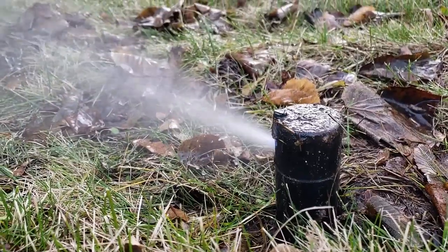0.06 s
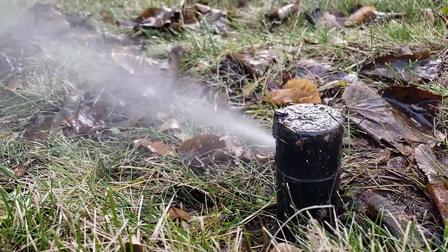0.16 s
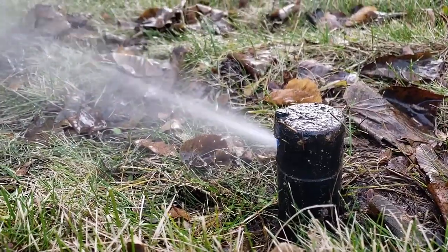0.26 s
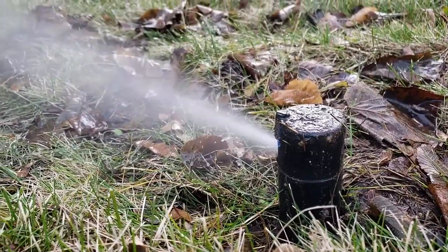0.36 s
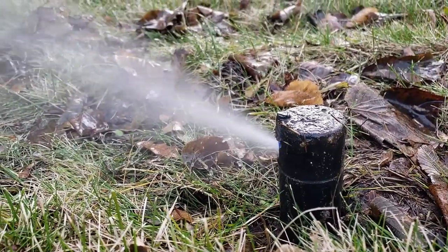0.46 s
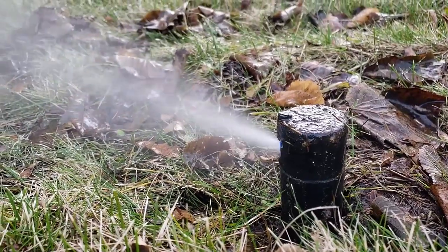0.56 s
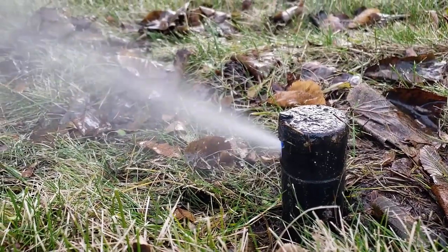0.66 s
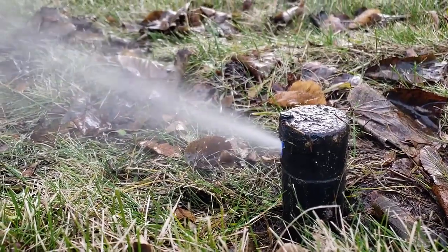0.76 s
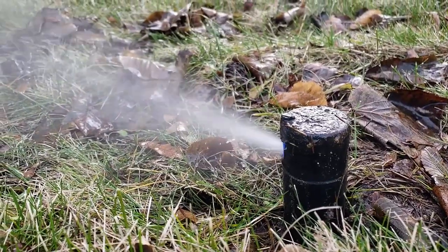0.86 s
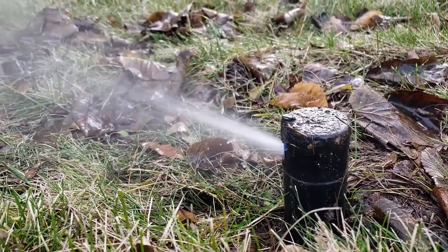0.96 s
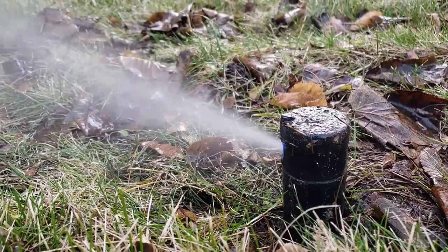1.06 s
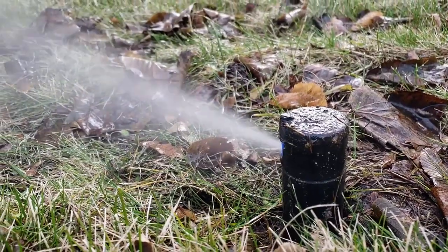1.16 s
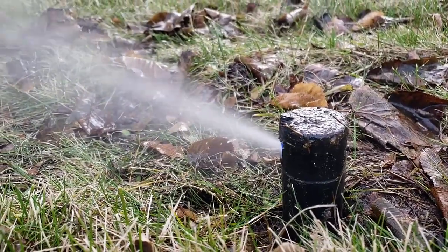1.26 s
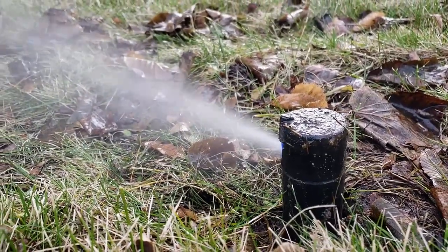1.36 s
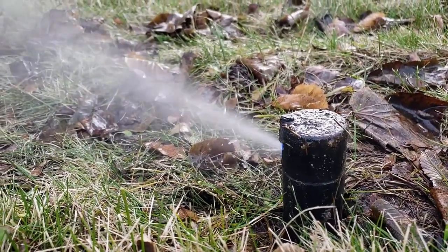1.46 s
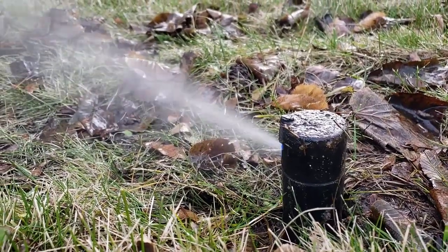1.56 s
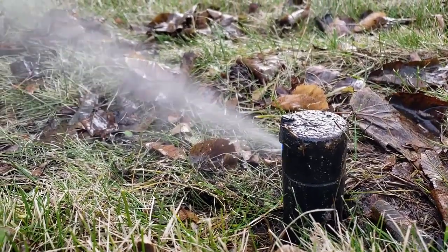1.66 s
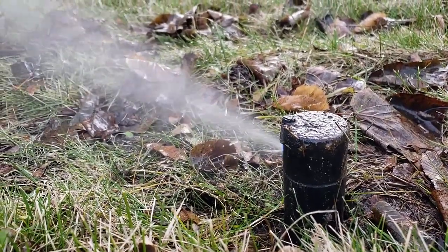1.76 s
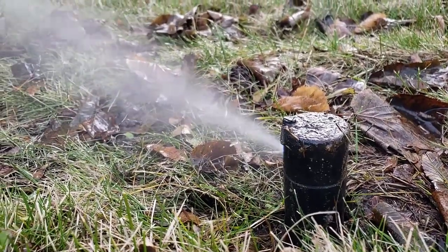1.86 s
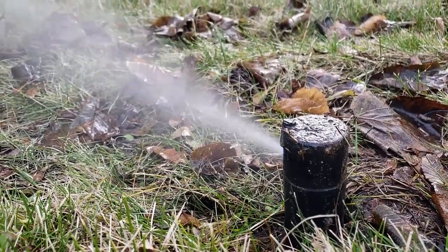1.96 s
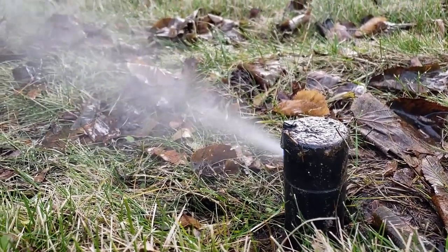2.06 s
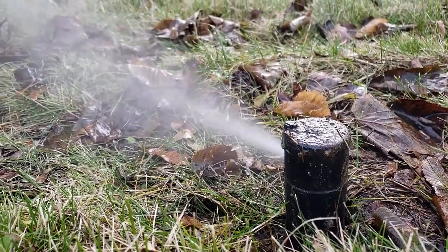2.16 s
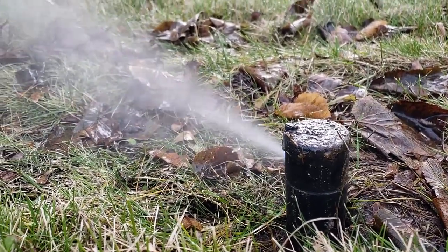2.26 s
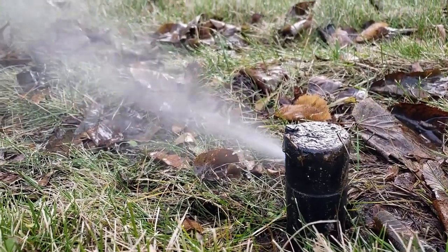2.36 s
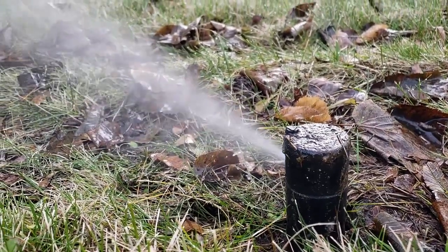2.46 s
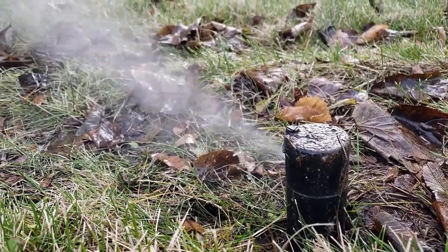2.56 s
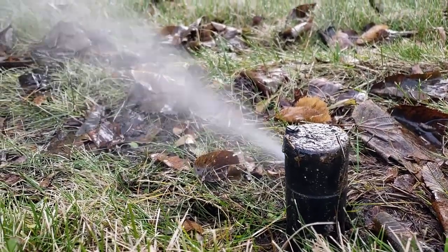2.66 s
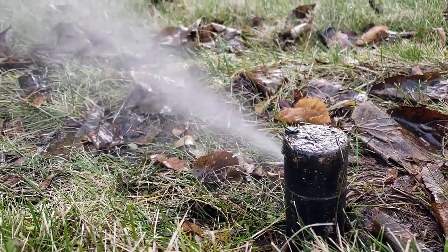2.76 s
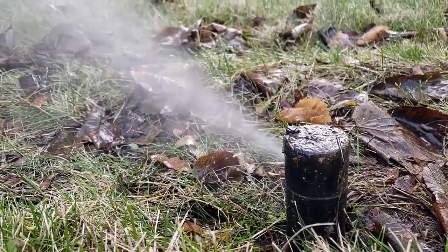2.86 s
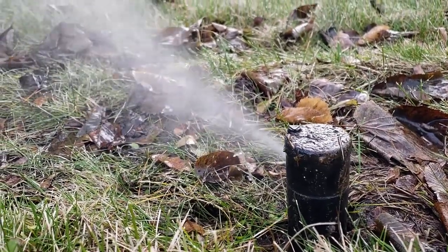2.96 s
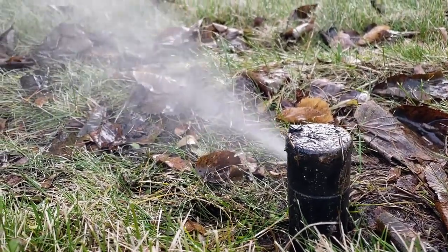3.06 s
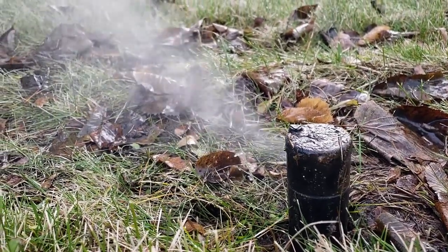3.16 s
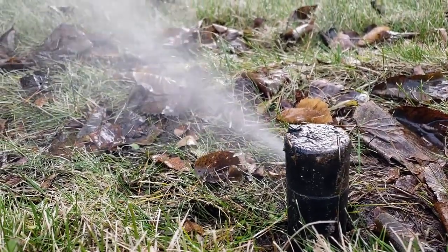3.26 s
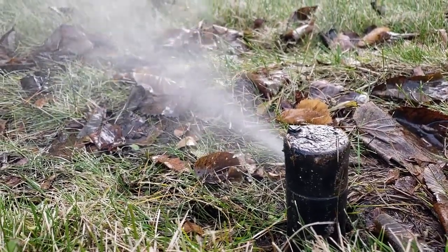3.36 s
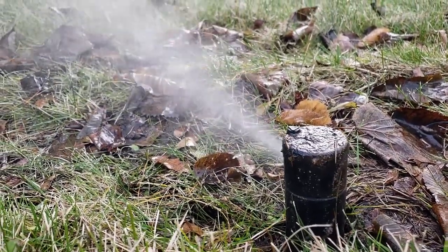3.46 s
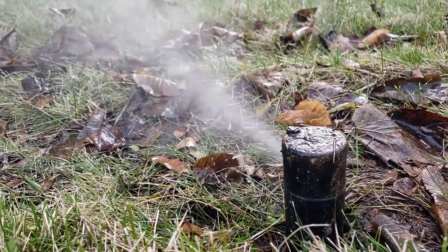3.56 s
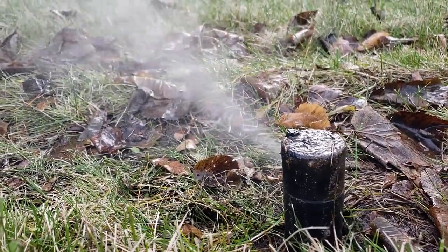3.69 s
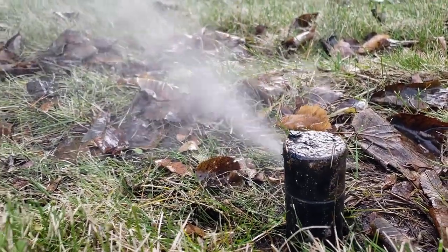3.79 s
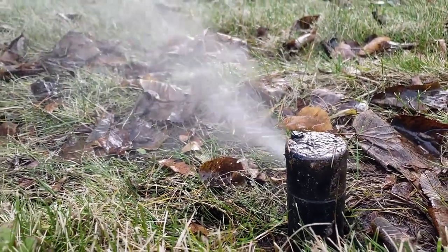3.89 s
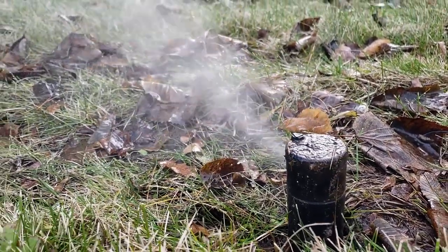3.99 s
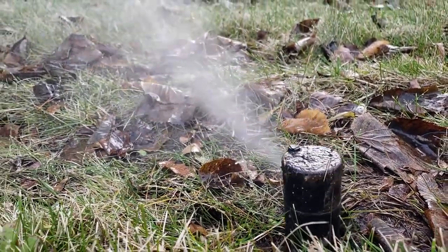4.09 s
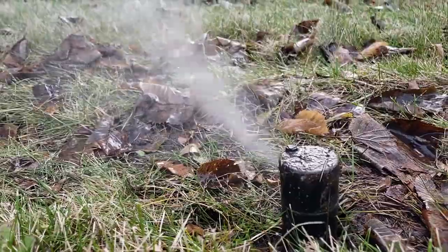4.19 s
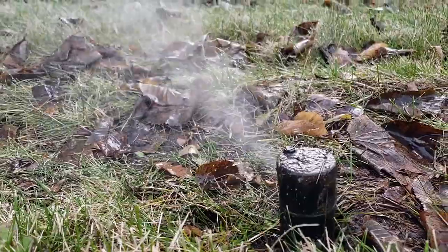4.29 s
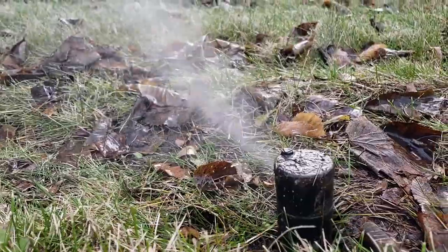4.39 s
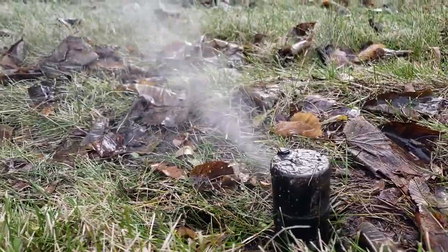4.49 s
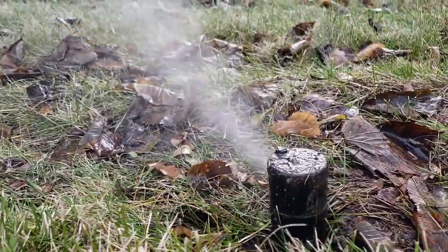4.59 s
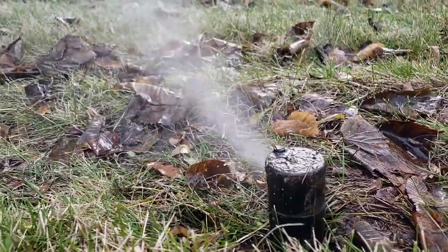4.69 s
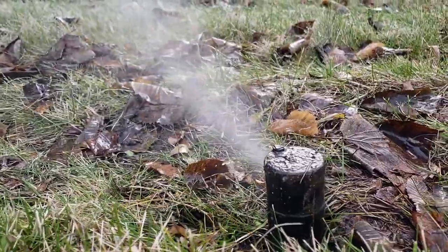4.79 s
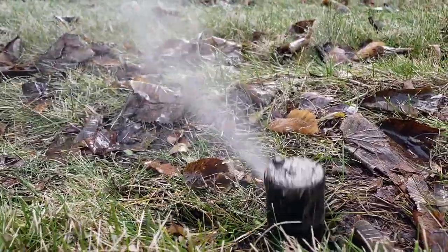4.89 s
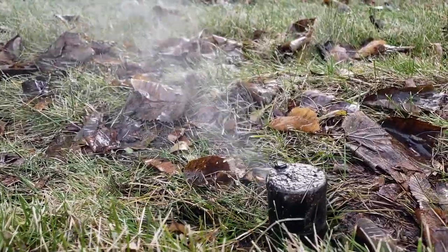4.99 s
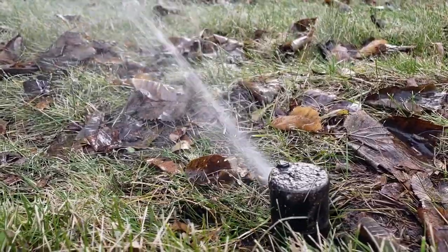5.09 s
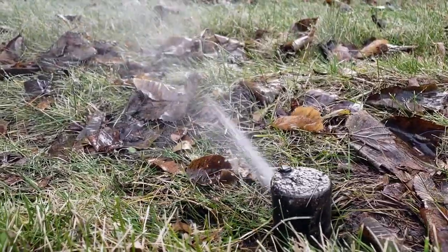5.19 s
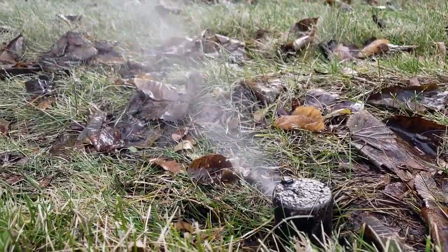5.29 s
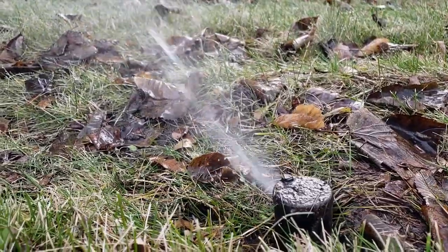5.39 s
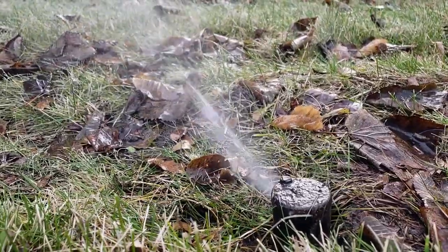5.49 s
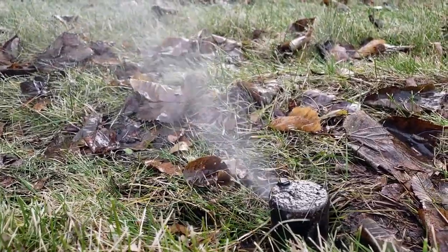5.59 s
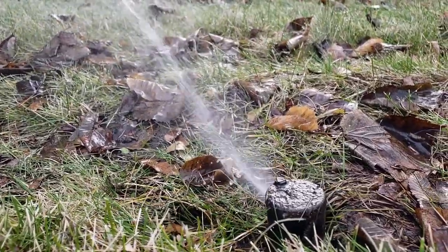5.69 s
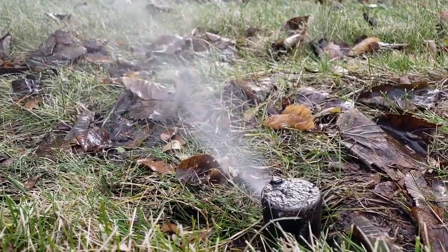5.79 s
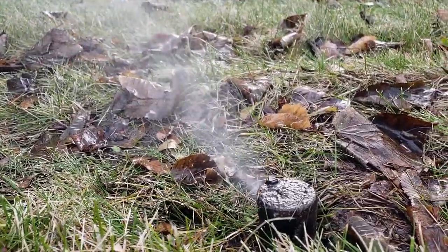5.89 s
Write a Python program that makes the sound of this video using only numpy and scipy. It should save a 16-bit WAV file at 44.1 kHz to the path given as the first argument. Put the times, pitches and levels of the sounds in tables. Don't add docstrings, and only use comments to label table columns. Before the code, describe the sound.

A loud, close sprinkler hiss of air and fine mist runs steadily, then starts stuttering and sputtering in quick tiny dropouts.

```python
import sys
import numpy as np
from scipy import signal
from scipy.fft import rfft, irfft, next_fast_len
from scipy.io import wavfile
from scipy.ndimage import uniform_filter1d, map_coordinates

SR = 44100
rng = np.random.default_rng(int(sys.argv[2]) if len(sys.argv) > 2 else 0)


def boost(x):
    u = np.asarray(x, float) / 20
    return 10 ** u


def transcribe(u):
    v = np.clip(np.atleast_2d(u).T, -1, 1)
    q = np.round(v * 32767).astype(np.int16)
    wavfile.write(sys.argv[1], SR, q)


N = 261954
FRAME = 1024


def unit(x):
    return x / np.sqrt(np.mean(np.abs(x) ** 2) + 1e-20)


def mid_rms(pair):
    return np.sqrt(np.mean(pair.mean(axis=0) ** 2))


def curve(rows, t=None):
    return np.interp(np.arange(N) / SR if t is None else t, *np.transpose(rows))


def wobble(rate, count=N):
    knots = rng.standard_normal(int(N * rate / SR) + 4)
    return map_coordinates(knots, [np.arange(count) * (N / count * rate / SR)])


def coloured(x, response):
    m = next_fast_len(N + 8192)
    spectrum = rfft(x, m) * response(np.fft.rfftfreq(m, 1 / SR))
    return irfft(spectrum, m)[..., :N]


def sample_at(t):
    return np.minimum((t * SR).astype(int), N - 1)


def turbulence(spit_db, flutter_db, drops_per_s, drop_db):
    flutter = boost(flutter_db * wobble(260) + spit_db * wobble(60))
    noise = unit(rng.standard_normal((3, N)) * flutter)
    when, size = rng.random((int(drops_per_s * N / SR), 2)).T
    spits = np.bincount((when * N).astype(int), 1 / np.maximum(size, .03), N)
    spits = np.sqrt(np.abs(uniform_filter1d(spits, size=40)))
    first_only = np.eye(3)[:, :1]
    return noise + first_only * boost(drop_db) * unit(spits * rng.standard_normal(N))


def responses(hz, rows):
    left = right = scattered = 0
    for centre, width, db, pan_db, lead, phase in rows:
        shape = boost(db) / (1 + (2 * (hz - centre) / width) ** 2) ** 2
        port = boost(pan_db / 2) * np.exp(.5j * lead)
        left = left + shape * (np.exp(1j * phase) * port)
        right = right + shape * (np.exp(1j * phase) / port)
        scattered = scattered + shape ** 2
    return np.array([left, right, np.sqrt(scattered)])


def fringes(hz, t, sway):
    # (centre [Hz], width [Hz], level [dB], left minus right [dB], left lead [rad], phase [rad])
    aim_left = [(960, 810, -33.2, -2.1, 0.11, -1.08), (1410, 1300, -31.4, -2.6, -0.22, 3.53),
                (1880, 2580, -37.3, -12.0, 0.32, 1.49), (2390, 670, -14.9, 3.3, -0.33, 2.95),
                (2830, 970, -8.2, 1.0, 0.14, 4.62), (4040, 2360, -6.0, 2.1, 0.12, 6.3),
                (4880, 1590, -3.9, 3.4, 0.33, 9.22), (5850, 1320, 2.5, 1.1, -0.35, 9.04),
                (5980, 2230, -1.7, -1.2, -0.7, 12.2), (7290, 970, -9.0, -2.4, 2.97, 12.06),
                (8020, 760, -13.0, 4.2, 0.9, 12.51), (8850, 2600, -4.6, -0.8, 1.61, 15.08),
                (9390, 2600, -4.7, -4.3, 1.23, 18.0), (11020, 2600, -0.9, -3.0, 3.15, 17.39),
                (11710, 890, 0.6, -0.6, 5.53, 17.52), (11820, 2050, -1.3, -0.6, 4.22, 20.52),
                (13550, 1950, -1.6, -2.7, 7.53, 19.99), (13910, 1200, 2.3, -1.9, 6.65, 22.93),
                (14880, 1220, -2.2, 0.5, 9.92, 21.47), (15160, 2350, -1.1, -1.8, 10.18, 23.93)]
    aim_away = [(920, 810, -28.3, 0.2, 0.13, -0.9), (1520, 1610, -24.9, -2.3, -0.34, 4.03),
                (1970, 1860, -21.8, -3.2, -0.71, 0.85), (2280, 520, -10.4, 3.5, -0.68, 3.59),
                (2890, 970, -2.3, 0.9, 0.33, 4.74), (4010, 1310, -1.1, 0.9, -0.02, 6.09),
                (5180, 1280, -2.8, 3.7, 1.46, 7.36), (6010, 1470, 3.0, -0.5, -0.14, 9.79),
                (6300, 1540, 0.2, -0.6, -0.88, 12.97), (7420, 1080, -3.8, -1.9, 2.75, 13.09),
                (8350, 490, -16.0, 4.4, -2.25, 12.86), (9230, 1700, -3.8, 0.6, 1.9, 15.45),
                (9930, 1440, -1.1, -0.2, 1.53, 17.9), (11430, 2580, -1.3, -3.1, 3.8, 18.66),
                (12380, 1820, -1.3, -6.6, 7.74, 17.79), (12510, 1220, -0.5, -2.4, 7.1, 20.91),
                (13660, 2500, 1.6, -0.2, 8.09, 21.01), (14220, 2470, -0.8, -0.6, 7.69, 23.96),
                (15190, 940, 0.6, -2.7, 9.64, 20.84), (14990, 2440, -2.0, -4.1, 10.22, 23.81)]
    tilt_one = [(990, 540, -32.2, 4.0, -0.89, 1.37), (1390, 450, -23.9, 4.3, 0.59, 4.58),
                (1650, 2600, -25.4, 5.8, 0.69, 2.29), (2290, 350, -15.2, 1.7, -0.52, 3.64),
                (2900, 890, -5.5, 0.2, -0.02, 4.26), (3830, 2600, -5.5, 5.2, 0.26, 5.75),
                (4270, 1770, 1.4, 2.1, 0.58, 8.21), (5650, 1680, -5.3, -4.2, 1.76, 8.26),
                (6240, 2240, -0.9, -8.8, 0.65, 11.07), (6590, 1430, -1.6, -8.1, -0.01, 14.04),
                (7740, 1520, -10.7, -2.3, 2.68, 14.31), (8770, 2600, -13.0, -1.3, 0.45, 14.83),
                (9650, 810, -10.6, -3.9, 2.8, 14.92), (10580, 2600, -2.7, 1.6, 0.55, 17.96),
                (10920, 2410, -1.1, 0.9, 5.21, 18.24), (11920, 310, -14.8, -5.9, 5.59, 15.27),
                (12730, 1860, -4.5, -1.0, 8.7, 18.15), (13980, 1740, -1.8, -11.2, 15.04, 20.54),
                (14050, 2600, -0.5, -9.1, 8.81, 20.71), (15530, 710, -11.8, -10.3, 13.09, 20.35)]
    tilt_two = [(1110, 440, -15.3, 2.1, 0.79, 5.11), (1390, 390, -10.7, 6.6, 0.49, 7.35),
                (1870, 1240, -19.2, 12.0, 0.53, 9.86), (2230, 1050, -15.7, 5.1, 0.36, 13.0),
                (3020, 1520, -10.2, 0.1, 0.32, 15.9), (4120, 1410, -6.3, 12.0, 0.61, 16.69),
                (4510, 1770, 2.2, 4.3, 1.8, 18.58), (5150, 2450, 0.9, 1.9, 1.66, 20.99),
                (6130, 1550, -4.4, -2.6, 1.92, 18.39), (6850, 2220, -9.8, -3.1, 1.76, 22.12),
                (7710, 1520, -20.3, 11.9, 3.78, 22.75), (9220, 1910, -7.8, -0.2, 3.16, 25.53),
                (10120, 2600, -1.4, -1.0, 3.22, 28.33), (10760, 1950, -1.8, 2.2, 3.78, 29.96),
                (11550, 2600, -2.1, -4.3, 4.06, 32.12), (12350, 2600, -2.5, -2.8, 3.93, 35.07),
                (13200, 2040, -1.9, -3.1, 3.19, 38.06), (14240, 2600, -1.3, -1.6, 2.97, 40.86),
                (14560, 1670, -3.0, -2.6, 2.21, 44.08), (15390, 2220, -5.7, -3.9, 4.53, 43.8)]
    tilt_three = [(1060, 360, -14.3, 1.8, 0.38, 5.56), (1430, 560, -10.7, 6.2, 0.78, 5.72),
                  (1900, 1150, -12.5, 11.9, 0.24, 8.4), (2210, 950, -11.8, 8.7, -0.52, 11.39),
                  (3150, 2560, -11.2, 12.0, 3.58, 10.67), (3450, 2220, -5.2, 8.9, 2.01, 14.11),
                  (3920, 1930, -7.0, 5.5, 0.92, 17.28), (5390, 2600, 0.1, 1.1, 1.9, 20.37),
                  (6340, 1120, -5.5, -4.4, 3.16, 20.69), (6440, 2600, -2.9, -3.6, 2.38, 23.71),
                  (7490, 1620, -10.8, -5.9, 3.11, 26.74), (8460, 2590, -12.5, -0.6, 2.7, 28.27),
                  (9720, 1180, -3.8, -1.1, 2.33, 29.73), (9880, 1180, -4.2, -4.5, -2.21, 29.38),
                  (10860, 2600, -1.6, -5.8, -0.49, 32.42), (11700, 2600, -1.9, -5.4, -1.17, 35.37),
                  (12530, 2560, -4.4, -5.0, -1.44, 38.2), (13700, 2600, 0.3, -3.1, -1.67, 40.98),
                  (14190, 2290, 2.2, -3.1, -1.98, 44.12), (15280, 1970, -10.8, -1.3, 1.68, 44.21)]
    # (centre [Hz], width [Hz], level [dB], left minus right [dB], left lead [rad], phase [rad])
    riser = [
        (392, 306, -23, 15.5, .05, 1.2),
        (558, 308, -15.5, -2.2, 0.16, 1.12),
    ]
    # (time [s], level [dB])
    riser_heard = [(0, -1), (.3, -3.5), (1.1, -5), (1.4, -3.5), (1.68, -7), (1.95, -2), (2.4, 0), (2.7, -2),
                   (3.4, 2.5), (3.95, 4), (4.25, -2), (4.45, 0), (4.65, -3.5), (5.0, 0.5), (5.25, 2.5),
                   (5.45, -0.5), (5.9, 1.5)]
    # (time [s], share of the swing [0-1])
    turn = [(.7, 0.0043), (1.5, 0.082), (2.1, 0.27), (2.8, 0.73), (3.5, 1.08), (4.1, 1.01)]
    # (start [s], end [s])
    tilts = [
        (4.1, 4.2),
        (4.96, 5.03),
        (5.3, 5.45),
    ]

    hz = hz[:, None] * (1 + sway * wobble(3.4)[sample_at(t)])
    left, away = np.array(aim_left)[..., None], np.array(aim_away)[..., None]
    sets = [left + (away - left) * curve(turn, t), tilt_one, tilt_two, tilt_three]
    tipped = sum(np.interp(t, span, [0, 1]) for span in tilts)
    ground = 0
    for k, rows in enumerate(sets):
        ground = ground + np.clip(1 - np.abs(tipped - k), 0, 1) * responses(hz, rows)
    gurgle_db = 1.0 * wobble(30, count=len(t))
    return ground + boost(curve(riser_heard, t) + gurgle_db) * responses(hz, riser)


def nulls(hz, t, rows, flicker):
    fade_s, wander = .04, .012
    loss_db = np.zeros((len(hz), len(t)))
    for start, end, first_hz, last_hz, db in rows:
        drift = np.interp(t, [start, end], [first_hz, last_hz])
        centre = drift * (1 + wander * wobble(4.93, count=len(t)) * np.sqrt(2000 / first_hz))
        steadiness = 1 if db > 0 else .5
        unsteady = np.exp(flicker * np.tanh(wobble(12, count=len(t))) * steadiness)
        present = np.clip(np.minimum(t - start, end - t) / fade_s, 0, 1) * unsteady
        on = present > 0
        width = 90 + .021 * centre[on]
        loss_db[:, on] += db * present[on] * np.exp(-((hz[:, None] - centre[on]) / width) ** 2)
    return boost(-loss_db)


def at_ports(hz, t, z, choke_db):
    # (start [s], end [s], first centre [Hz], last
    # centre [Hz], depth [dB])
    shared_nulls = [(-.3, 1.7, 1600, 1600, 5), (1.7, 4.2, 1600, 1550, 5), (-.3, 4.3, 1810, 1780, -6),
                    (-.3, 4.95, 2030, 1950, 7), (-.3, 2.2, 4500, 4550, 4.5), (2.2, 4.1, 4600, 4800, 2.5),
                    (-.3, 4.1, 6300, 6450, 4), (1.65, 2.5, 7800, 8000, 16), (2.45, 3.85, 8050, 8150, 5),
                    (5.05, 5.36, 8700, 8600, -8), (1.7, 2.6, 10500, 10900, 6), (4.08, 4.4, 11500, 11900, 7),
                    (4.3, 5.05, 9700, 9800, 5), (4.55, 4.96, 7450, 7700, 11), (4.6, 4.96, 12000, 12200, 6),
                    (5.1, 5.42, 2400, 2380, 11), (4.98, 5.35, 6700, 6200, 7), (5.33, 5.45, 4400, 4250, 13),
                    (5.35, 5.45, 3900, 3600, 8), (5.47, 5.62, 4500, 4400, 13), (5.55, 5.67, 3800, 3800, 10),
                    (5.75, 5.9, 4450, 4400, 15), (5.75, 5.92, 3700, 3600, 15), (5.36, 5.55, 8700, 8600, -8),
                    (5.7, 5.78, 8300, 8300, -15), (5.55, 5.6, 8600, 8600, -9), (5.6, 5.72, 8400, 8300, 7),
                    (5.75, 6.2, 8500, 8600, 9), (5.3, 5.38, 8000, 8100, -9), (5.42, 5.56, 8200, 8300, -11),
                    (3.8, 4.25, 7800, 7900, -5), (4.0, 4.6, 11400, 11600, 4), (2.3, 3.8, 12000, 12300, 5),
                    (1.3, 2.6, 12700, 12900, 3), (4.96, 5.1, 8400, 8600, 7), (2.6, 4.3, 7250, 7350, -5),
                    (3.8, 4.2, 15500, 15600, -4), (5.23, 5.33, 9300, 9200, 6), (5.13, 5.22, 10000, 10000, 6),
                    (5.5, 5.75, 12200, 11700, 6)]
    # (start [s], end [s], first centre [Hz],
    # last centre [Hz], depth [dB])
    gliding_bands = [(1.1, 3.3, 12100, 12300, -3), (1.1, 4, 13700, 12200, -2), (2.4, 3.3, 13700, 15300, -4),
                     (3.75, 5.4, 14300, 12800, -4), (4.02, 4.6, 15000, 11700, -6.5),
                     (4.8, 3.6, 12200, 13000, -3), (1.3, 4.8, 6340, 6480, -5.5),
                     (0.41, 2.94, 5120, 5220, 3.5), (1.8, 5.2, 7800, 7200, -0.5), (2.9, 3.2, 7700, 7400, 5),
                     (5.4, 6.2, 3700, 4140, -7), (4.8, 6.7, 11000, 12400, -4), (5.6, 6.2, 13000, 13000, -8),
                     (5.5, 4.8, 13300, 11000, 9), (4.9, 4.7, 15500, 15000, 4), (0.75, 1.16, 8500, 8500, 2),
                     (4.55, 4.6, 4350, 4600, 5.5), (3.6, 5.9, 4600, 3900, -1), (1.5, 1.76, 2700, 2600, 8),
                     (4.98, 6.2, 2200, 2470, -1.5), (4.15, 4.4, 1100, 1100, 2), (5.65, 5.4, 1300, 1200, 10),
                     (1.6, 2.3, 12000, 14000, -1), (5.5, 7, 5500, 5300, 3), (4.98, 6.8, 790, 790, -7),
                     (3.8, 4.8, 1770, 2070, -4.5), (1.6, 4.2, 15400, 16000, -3.5),
                     (5.04, 5.8, 14800, 12800, 5), (5.04, 5.7, 11800, 12000, 13), (5.5, 4.5, 6500, 6300, 3),
                     (4.75, 5.4, 1750, 1700, 4), (.2, .8, 1650, 1600, -3), (1.16, 2.2, 1500, 1400, -2.5),
                     (1.95, 2.25, 1860, 2000, 10), (2.2, 2.95, 1750, 1750, 5), (2.5, 2.85, 4400, 4400, 3),
                     (5.0, 5.6, 1050, 1080, -5), (5.2, 4.6, 940, 850, 4.5), (3.04, 3.4, 11400, 11800, 2.5),
                     (1.5, 2.9, 7300, 6900, -3)]

    *direct, scattered = fringes(hz, t, sway=0.0018)
    norm = np.sqrt(np.mean(np.abs(direct[0] + direct[1]) ** 2, axis=0))
    field = uniform_filter1d(rng.standard_normal(z.shape[1:]), size=14, axis=0)
    field = uniform_filter1d(field, size=4, axis=1)
    patch = boost(unit(field) * (0.75 + 0.5 * (hz[:, None] < 900))) / norm
    blades = uniform_filter1d(rng.standard_normal(z[1:].shape), size=3, axis=1)
    blades = uniform_filter1d(blades, size=40, axis=2)
    direct = direct * boost(2.45 * unit(blades))

    riding_db = .6 * uniform_filter1d(choke_db, size=FRAME // 2)[sample_at(t)]
    scatter_db = -17 + riding_db - 6 * (hz[:, None] < 2100)
    ports = direct * z[0] + boost(scatter_db) * scattered * z[1:]
    glides = nulls(hz, t, gliding_bands, flicker=.15)
    cancelled = (1 - nulls(hz, t, shared_nulls, flicker=.5)) * ports.mean(axis=0)
    return patch * glides * (ports - cancelled)


def jet():
    # (time [s], hiss level [dB])
    flow = [(0, -26.5), (.7, -25), (1.3, -25), (1.68, -27.5), (2.2, -26.5), (2.75, -28), (3.1, -27.5),
            (3.5, -28), (4.1, -27), (4.35, -29), (4.8, -28), (5.05, -30.5), (5.25, -28.5), (5.45, -28),
            (5.58, -30), (5.78, -28.5), (5.94, -28)]

    noise = turbulence(spit_db=0.13, flutter_db=0.85, drops_per_s=150, drop_db=-14.5)
    hz, t, z = signal.stft(noise, SR, nperseg=FRAME)
    choke_db = slugs()
    hiss = signal.istft(at_ports(hz, t, z, choke_db), SR, nperseg=FRAME)[1][:, :N]
    hiss = coloured(hiss, lambda hz: 1 / (1 + (250 / (hz + 1)) ** 8))
    mist = coloured(hiss, lambda hz: 1 / (1 + (6500 / (hz + 1)) ** 4))
    surge_db = 0.24 * wobble(6.1) + 0.3 * wobble(16) + 0.31 * wobble(40)
    gain_db = surge_db - choke_db
    choked = (hiss - mist) * boost(gain_db) + mist * boost(0.6 * gain_db)
    return choked / mid_rms(hiss) * boost(curve(flow) + 0.13)


def hum(rows):
    s, hz, db = np.transpose(rows)
    pitch = curve(np.c_[s, hz]) * (1 + 0.0055 * wobble(6.1))
    level_db = curve(np.c_[s, db]) + 3.0 + 1.7 * wobble(4.9)
    return boost(level_db) * np.sin(2 * np.pi * np.cumsum(pitch) / SR)


def yard():
    # (time [s], level [dB])
    rumble_level = [(0, -78), (1.35, -78.5), (1.65, -82), (2.2, -77), (2.7, -78), (3.2, -77), (4, -75.5),
                    (5.94, -73)]
    # (frequency [Hz], density [dB per Hz])
    rumble_spectrum = [(12, -39), (20, -18), (59, -6.5), (197, -9), (230, -11), (300, -34), (510, -120)]
    # (time [s], pitch [Hz], level [dB])
    hum_low = [(0, 64, -86), (3.9, 64, -83), (4.2, 65.3, -77.5), (5.94, 63.6, -70)]
    hum_high = [(0, 175, -107), (4.6, 177.6, -80), (4.8, 173.2, -75.5), (5.94, 170.2, -74)]

    f, db = np.transpose(rumble_spectrum)
    tint = lambda hz: boost(np.interp(np.log(hz + 1), np.log(f + 1), db))
    mid, side = coloured(rng.standard_normal((2, N)), tint)
    rumble = boost(curve(rumble_level) + 4.5) * unit(mid + boost(-22) * np.array([side, -side]))
    machinery = hum(hum_low) * boost([[-2.5], [2.5]]) + hum(hum_high)
    return rumble * boost([[-1.4], [1.4]]) + machinery


def slugs():
    # (time [s], depth [dB], length [s])
    chokes = [(0.521, 8, 0.0085), (1.716, 5.5, 0.016), (2.554, 5, 0.017), (2.67, 3.5, 0.042),
              (2.74, 5, 0.02), (3.243, 4.5, 0.026), (3.273, 9.5, 0.018), (3.312, 8, 0.018),
              (3.793, 4.5, .023), (3.839, 3, 0.021), (4.083, 5, 0.038), (4.118, 8, 0.009),
              (4.228, 14, 0.025), (4.261, 12.5, 0.011), (4.385, 12.5, 0.02), (4.442, 5.5, 0.0098),
              (4.46, 10, 0.0079), (4.525, 12, 0.021), (4.572, 6, 0.013), (4.723, 13, 0.019),
              (4.752, 11, 0.027), (4.933, 6.5, 0.045), (5.072, 1, 0.03), (5.099, 9.5, 0.025),
              (5.171, 8.5, 0.018), (5.29, 13.5, 0.011), (5.353, 7, 0.017), (5.407, 7.5, 0.035),
              (5.461, 19.5, 0.012), (5.558, 8, 0.029), (5.63, 3.5, 0.016), (5.725, 15.5, 0.031),
              (5.763, 4.5, 0.038)]
    # (time [s], lift [dB], length [s])
    spurts = [(3.503, 2.5, 0.028), (4.807, 3.5, 0.073), (4.9, 6.5, 0.016), (4.289, 3.5, 0.012),
              (4.977, 5, 0.014), (5.675, 2, 0.026)]
    build_up, rebound = 0.1, 0.056
    spurt_lengths = 1.76

    s = np.arange(0, N / SR, .001)
    bump = lambda at, length: np.exp(-(1.91 * (s - at) / length) ** 2)
    loss_db = np.zeros(len(s))
    for at, db, length in chokes:
        before = build_up * bump(at - spurt_lengths * length, length)
        after = rebound * bump(at + spurt_lengths * length, length)
        loss_db += db * (bump(at, length) - before - after)
    for at, db, length in spurts:
        loss_db -= db * bump(at, length)
    return curve(np.c_[s, loss_db])


def scene():
    return jet() + yard()


def band_limit(x):
    return signal.sosfilt(signal.butter(12, 15850, fs=SR, output="sos"), x)


def record(dry):
    mix = coloured(dry, lambda hz: hz < 15790)
    return band_limit(mix)


dry = scene()
out = record(dry)
transcribe(out)
```